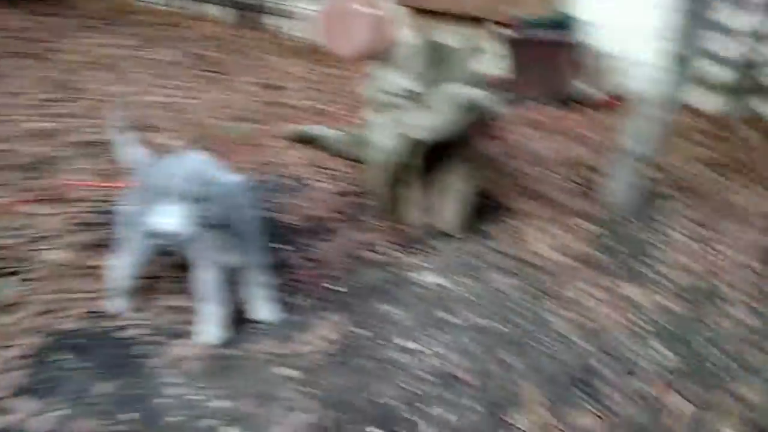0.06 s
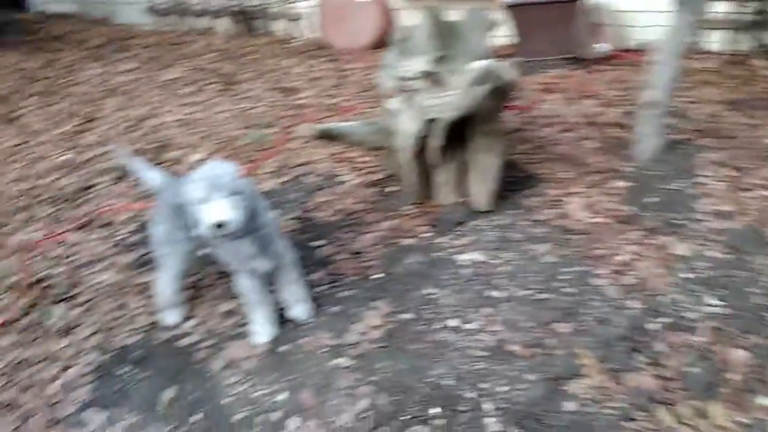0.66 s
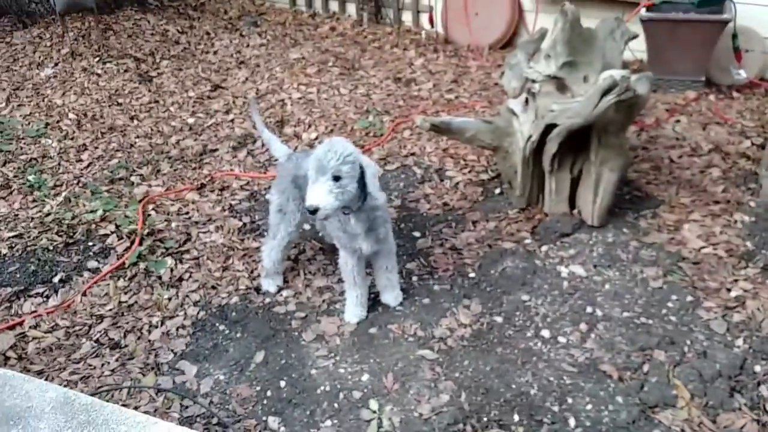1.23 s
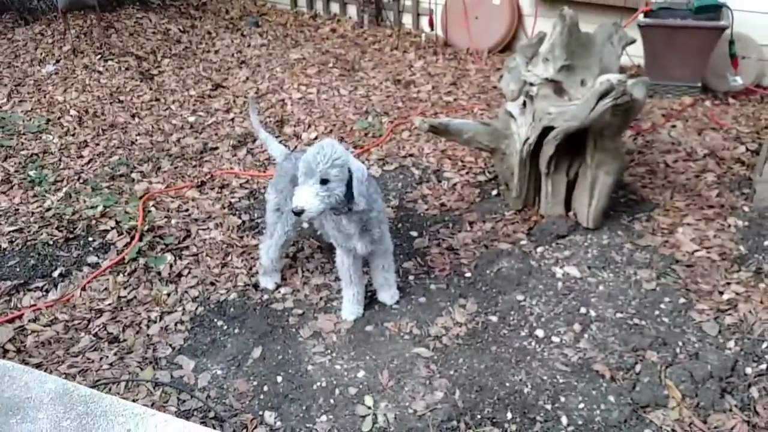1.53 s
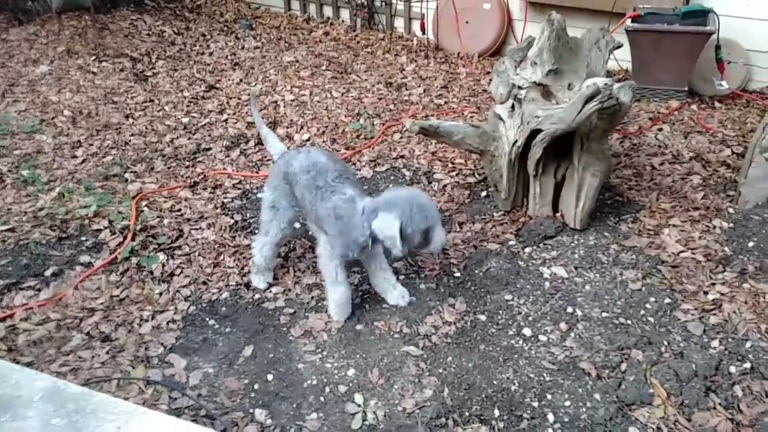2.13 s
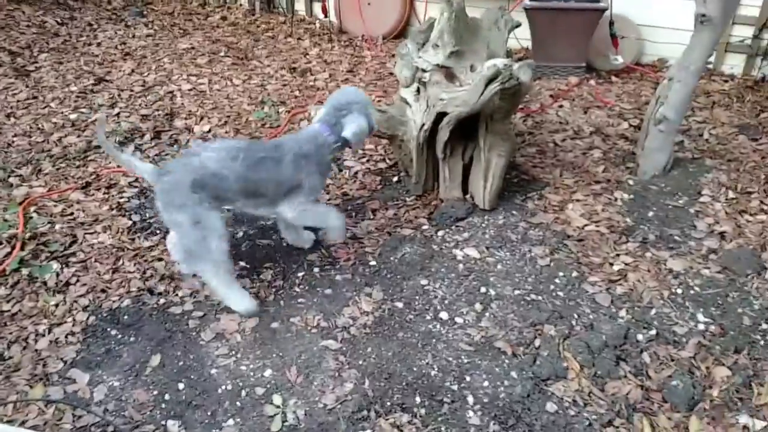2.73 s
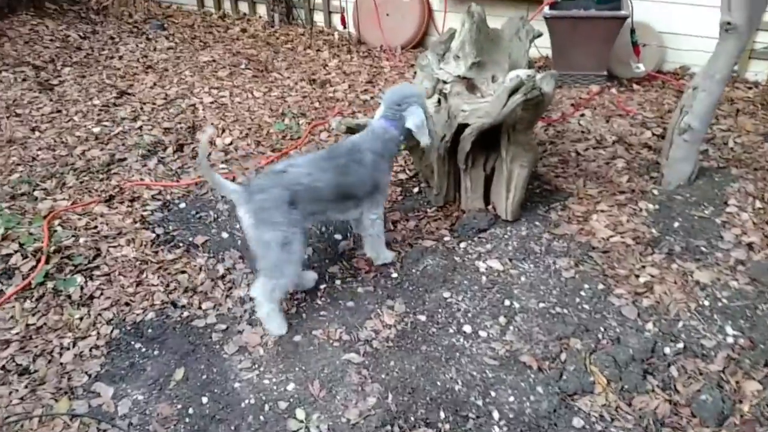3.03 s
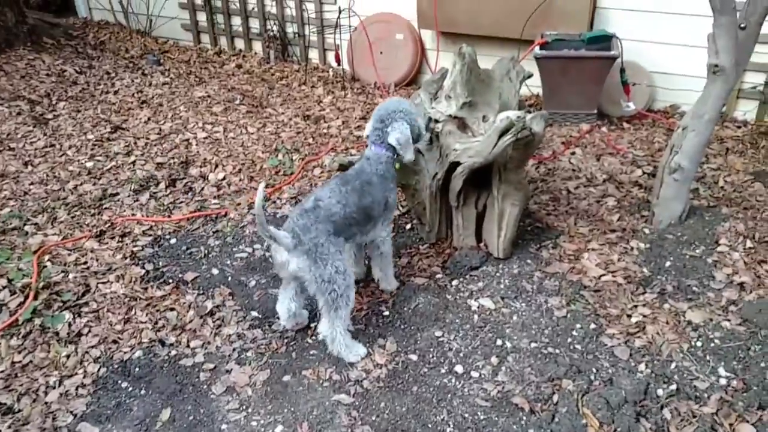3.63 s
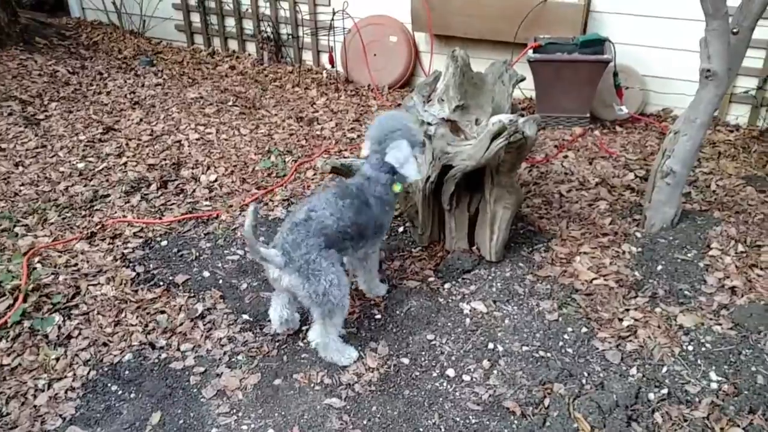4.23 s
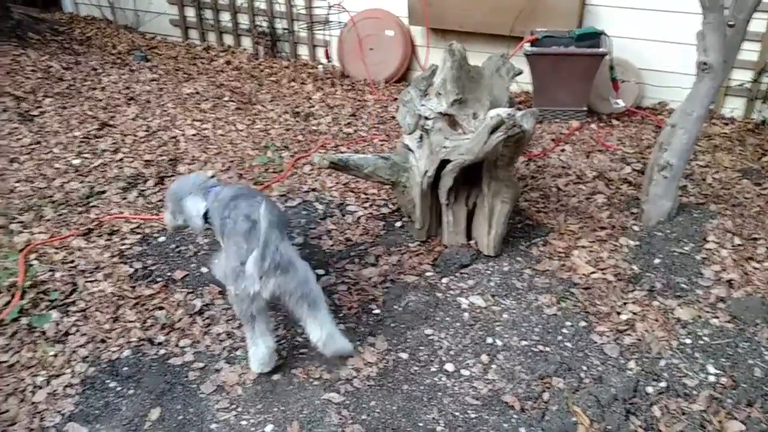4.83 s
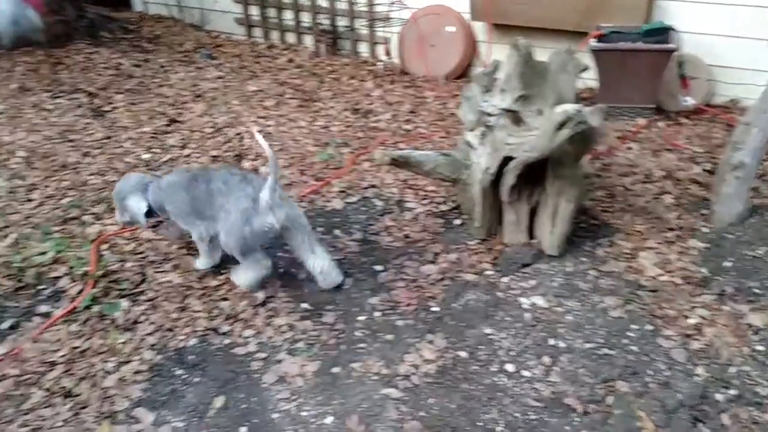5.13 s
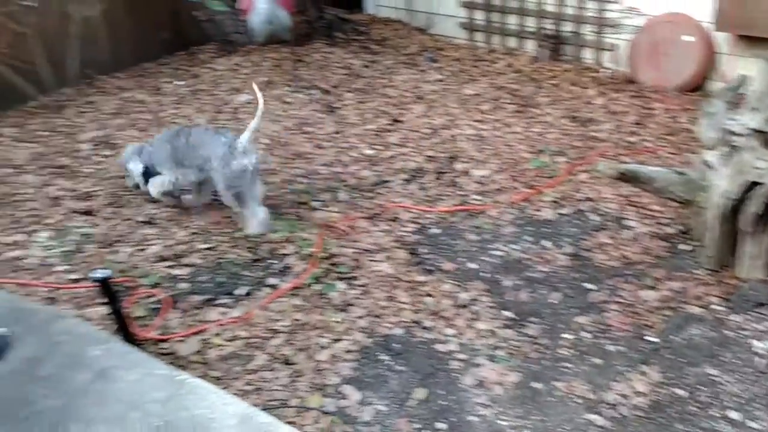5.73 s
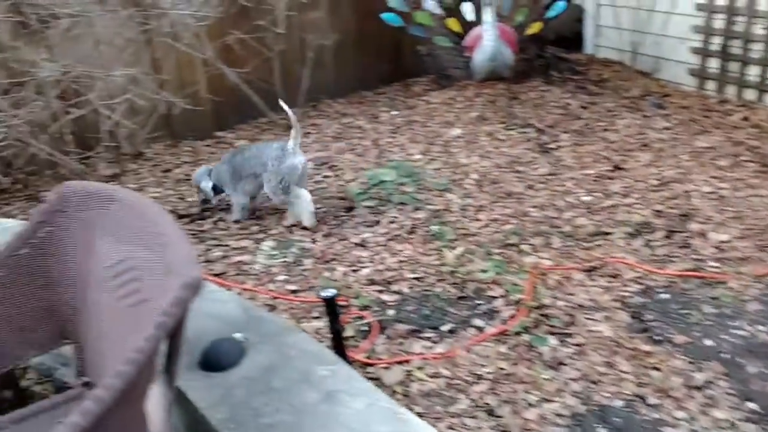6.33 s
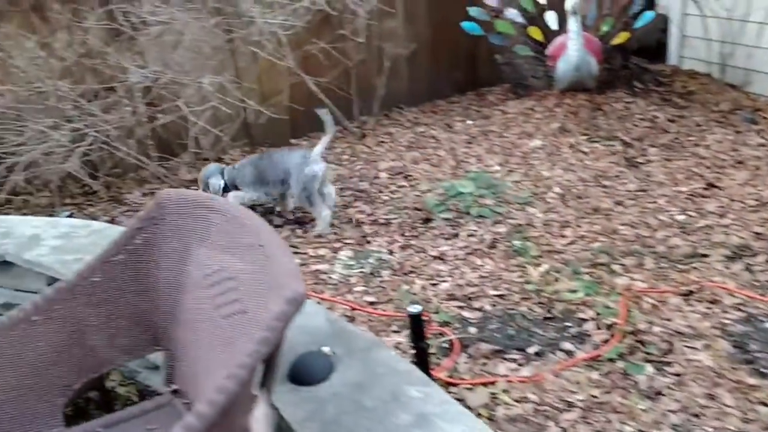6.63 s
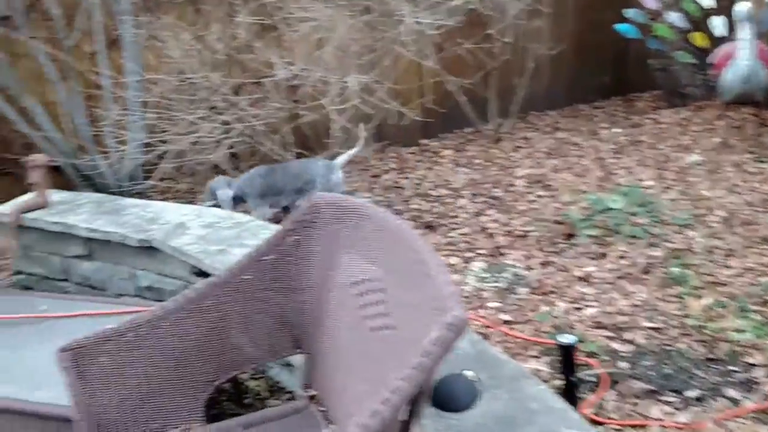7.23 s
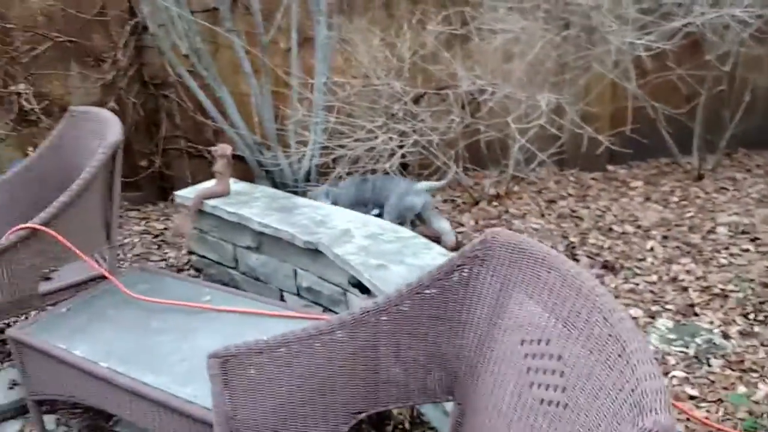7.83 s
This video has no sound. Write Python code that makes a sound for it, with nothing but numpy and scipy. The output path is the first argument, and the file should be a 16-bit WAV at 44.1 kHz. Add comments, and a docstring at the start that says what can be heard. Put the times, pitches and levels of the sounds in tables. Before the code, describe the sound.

Sparrows chirp in short, raspy, gliding notes from the start until about 7.2 seconds, slightly smeared by the yard's walls. A flock chatters behind them, busiest in the first second and a half, and a low town hum runs throughout. The hand-held microphone takes dull low thumps with some rumble, the loudest sounds here, at 0.1 to 0.4 seconds and around 2.2, with softer ones near 1.5, 2.9 and 4.3. A puppy gives one short, breathy huff just before 2 seconds. Its paws crackle faintly in dry leaves from 2.5 to 3.2 seconds and again from 5.3 to 7.6. A far bird calls softly and hoarsely between 5.6 and 7 seconds, while a distant vehicle's drone swells, peaking near 6.8. A light knock sounds close by at 7.3, then several more with a brief dull rub around 8 seconds.

```python
"""A fenced back yard, over the low hum of a town and a far vehicle. Sparrows chirp in gliding,
frequency-modulated whistles that house wall and fence smear by scattering; behind them the flock
chatters and a far bird calls hoarsely. A puppy crackles through dry leaves and gives one short huff,
air noise shaped by its throat. The hand-held phone takes dull bumps and a handling rumble;
light knocks and a rub sound close by."""
import sys
import numpy as np
from scipy import signal
from scipy.fft import rfft, irfft, next_fast_len
from scipy.io import wavfile
from scipy.ndimage import uniform_filter1d

SR = 44100
rng = np.random.default_rng(int(sys.argv[2]) if len(sys.argv) > 2 else 0)


def generate_wav(sig):
    """Save sig (samples, or channels by samples) to the path in sys.argv[1] as 16-bit PCM at SR."""
    pcm = np.round(np.clip(np.atleast_2d(sig).T, -1, 1) * 32767).astype(np.int16)
    wavfile.write(sys.argv[1], SR, pcm)


N = 355440
T = np.arange(N) / SR


def undb(db):
    """Amplitude ratio: a factor of ten per 20 dB."""
    return 10 ** (np.asarray(db) / 20)


def unit(x):
    """Normalisation to rms 1."""
    return x / np.sqrt(np.mean(x ** 2) + 1e-20)


def curves(table):
    """Linear interpolation of each column of a time table."""
    times, *columns = np.transpose(table)
    return [np.interp(T, times, column) for column in columns]


def add(out, start_s, x):
    """Superposition: x adds to out from start_s on."""
    i = max(int(start_s * SR), 0)
    out[i:i + len(x)] += x[:max(N - i, 0)]


def colour(x, spectrum):
    """Spectral shaping by (frequency_hz, gain_db) points, normalised to rms 1."""
    hz, db = np.transpose(spectrum)
    size = next_fast_len(len(x))
    bins_hz = np.maximum(np.fft.rfftfreq(size, 1 / SR), 1)
    gain = undb(np.interp(np.log(bins_hz), np.log(hz), db))
    return unit(irfft(rfft(x, size) * gain, size)[:len(x)])


def noise(spectrum):
    """Gaussian noise of the given spectral shape, rms 1."""
    return colour(rng.standard_normal(N), spectrum)


def resonate(x, hz, width_hz):
    """A second-order resonance, gain 1 at its centre."""
    return signal.lfilter(*signal.iirpeak(hz, hz / width_hz, fs=SR), x)


def wander(rate_hz):
    """Random modulation: rate_hz new values a second, spread near 1."""
    return np.interp(T * rate_hz, np.arange(2 ** 14), rng.standard_normal(2 ** 14))


def envelope(start_s, hold_s, attack_s, release_s):
    """Linear rise, hold and exponential decay."""
    rise = np.clip((T - start_s) / attack_s, 0, 1)
    return rise * np.exp(-np.maximum(T - start_s - attack_s - hold_s, 0) / release_s)


def yard(x, direct_db, t60_s=0.33):
    """Reverberation: wall, fence and houses scatter a decaying tail; direct_db is relative to it."""
    t = T[:SR // 2]
    decay = np.exp(-np.log(1000) * t / t60_s)
    response = unit(rng.standard_normal(len(t)) * decay) / np.sqrt(len(t))
    response[0] += undb(direct_db)
    return signal.fftconvolve(x, response / np.linalg.norm(response))


# distant traffic: time_s, hum_db, wash_db
TOWN_LEVELS = [(0, -42.5, -52), (1, -43, -54.5), (5.0, -42.5, -54), (5.8, -43.5, -54.5), (6.8, -43, -54),
               (8.06, -44.5, -55)]
# spectra of its low hum and broad wash: frequency_hz, gain_db
HUM_SPECTRUM = [(30, -21), (70, -10), (110, -5), (160, -1), (230, -4.5), (320, -10.5), (450, -16.5),
                (700, -41.5), (1500, -75)]
WASH_SPECTRUM = [(150, 7), (400, 2), (600, 1.5), (900, -1.5), (1400, -7), (2200, -12.5), (4000, -25),
                 (7000, -27.5), (11000, -30.5), (15500, -34)]

def town(whine_hz=614, whine_db=-70):
    """Incoherent summation: far traffic merges into noise, with a faint machine whine wavering in it."""
    hum_db, wash_db = curves(TOWN_LEVELS)
    hum = undb(hum_db + 1.07 * wander(13)) * noise(HUM_SPECTRUM)
    wash = undb(wash_db + 0.64 * wander(6)) * noise(WASH_SPECTRUM)
    phase = 2 * np.pi * np.cumsum(whine_hz + 3 * wander(8)) / SR
    whine = unit(np.sin(phase) + undb(-7) * np.sin(2 * phase))
    return hum + wash + undb(whine_db + 2.6 * wander(2.8)) * whine


# drone behind the houses: frequency_hz, gain_db
VEHICLE_SPECTRUM = [(100, -24), (190, 3), (280, 2.5), (420, -5), (650, -14), (1200, -46)]

def vehicle(nearest_s=6.81, nearest_db=-47, swell_s=0.99):
    """Attenuation with distance: a passing drone swells as it nears and fades as it recedes."""
    swell = undb(nearest_db) / (1 + ((T - nearest_s) / swell_s) ** 2)
    return swell * noise(VEHICLE_SPECTRUM)


# soft hoarse calls of a far bird: start_s, length_s, level_db
FAR_BIRD_CALLS = [(5.653, 0.15, -57), (5.86, 0.22, -59.5), (6.073, 0.066, -60), (6.677, 0.12, -59.5),
                  (6.793, 0.17, -58.5)]
# its throat resonance: frequency_hz, gain_db
FAR_BIRD_SPECTRUM = [(600, -19), (1100, -7), (1450, 1), (1750, -1), (2200, -27), (3500, -40)]

def far_bird():
    """Formant filtering: each call is noise that swells and fades in one narrow throat resonance."""
    swell = np.zeros(N)
    for start_s, length_s, level_db in FAR_BIRD_CALLS:
        add(swell, start_s, undb(level_db) * np.sqrt(np.hanning(int(length_s * SR))))
    return swell * noise(FAR_BIRD_SPECTRUM)


# base level of the further flock, busy at first: time_s, level_db
FLOCK_LEVELS = [(0, -59.5), (1.4, -68), (1.7, -73), (8.06, -77)]
# its chatter: frequency_hz, gain_db
CHATTER_SPECTRUM = [(1800, -20), (2600, 0.5), (3300, 9.5), (4200, 7.5), (5000, 1), (6000, -12), (7500, -38),
                    (10000, -28), (14000, -41)]

def flock(near_birds, blur_s=0.096, scatter_db=-5.5, fade_db_per_s=0.5, flicker_db=3):
    """Diffuse field: far chirps blur into chatter; a hiss of scattered chirps follows each near call."""
    near_rms = np.sqrt(np.abs(uniform_filter1d(near_birds ** 2, int(blur_s * SR))))
    scatter = near_rms * undb(scatter_db - fade_db_per_s * T)  # the hiss weakens over time
    swell = np.hypot(undb(curves(FLOCK_LEVELS)[0]), scatter)
    return swell * undb(flicker_db * wander(45)) * noise(CHATTER_SPECTRUM)


# something rubbing close by: time_s, level_db
RUB_LEVELS = [(7.6, -73), (7.8, -56.5), (7.95, -51), (8.06, -58)]
# its dull scrape: frequency_hz, gain_db
RUB_SPECTRUM = [(200, -14), (420, 9), (700, 1.5), (1100, -11), (1500, -6), (2200, -21), (4000, -42)]

def rub(catch_db=3):
    """Stick-slip friction: the noise flickers as the contact catches and slips."""
    return undb(curves(RUB_LEVELS)[0] + catch_db * wander(120)) * noise(RUB_SPECTRUM)


# light knocks close by: start_s, peak_db
KNOCK_HITS = [(.112, -40), (7.32, -43.5), (7.826, -47), (7.871, -46), (7.896, -45), (7.906, -49),
              (7.958, -35.5)]
# the modes they ring: frequency_hz, bandwidth_hz, gain_db
KNOCK_RESONANCES = [(624, 140, -19), (830, 610, 30), (1390, 180, 9)]

def knocks(contact_s=0.0027, scrape_db=-15, scrape_decay_s=0.032):
    """Impact excitation: brief rough contacts ring damped modes and scrape on a little."""
    out, t = np.zeros(N), T[:SR // 8]
    push = np.exp(-t / contact_s) + undb(scrape_db) * np.exp(-t / scrape_decay_s)
    for start_s, peak_db in KNOCK_HITS:
        force = rng.standard_normal(len(t)) * push
        ring = sum(undb(gain_db) * resonate(resonate(force, hz, width_hz), hz, hz)
                   for hz, width_hz, gain_db in KNOCK_RESONANCES)
        add(out, start_s, undb(peak_db) * ring / np.abs(ring).max())
    return out


# the hand shifts its grip: start_s, hold_s, level_db
GRIP_SHIFTS = [(0.29, 0.073, -32.5), (1.1, 0.078, -41), (1.44, 0.1, -38.5), (1.796, 1.2, -44.5),
               (2.22, 0.18, -39.5), (3.334, 0.43, -45.5), (4.206, 0.5, -46)]
# rumble of the grip: frequency_hz, gain_db
RUMBLE_SPECTRUM = [(8, -12), (25, 1.5), (50, 6), (80, 2), (130, -11.5), (300, -69)]
# fingers bump the phone: centre_s, peak_db, pitch_hz, half_length_s
FINGER_BUMPS = [ (.127, -19.5, 93, 0.0042), (0.295, -15.5, 134, 0.0036), (0.353, -21.5, 141, 0.0026),
                (0.398, -15.5, 119, 0.004), (1.545, -32.5, 147, 0.049), (2.166, -24, 119, 0.013),
                (2.177, -16.5, 150, 0.0035), (2.274, -13.5, 139, 0.0023), (2.289, -16, 114, 0.0056),
                (2.374, -25, 81, 0.0046), (2.916, -30, 48.3, 0.014), (4.235, -26, 103, 0.0048),
                (4.44, -26.5, 85, 0.0088)]

def handling(steady_hand_db=-52.5):
    """Structure-borne sound: the grip rumbles and soft fingers push the phone in short, low pulses."""
    shifts = sum(undb(level_db) * envelope(start_s, hold_s, attack_s=0.023, release_s=0.053)
                 for start_s, hold_s, level_db in GRIP_SHIFTS)
    out = np.hypot(shifts, undb(steady_hand_db)) * noise(RUMBLE_SPECTRUM)
    t = T[:SR // 5] - 0.1
    for centre_s, peak_db, pitch_hz, half_length_s in FINGER_BUMPS:
        pulse = np.exp(-(t / half_length_s) ** 2) * np.cos(2 * np.pi * pitch_hz * t)
        add(out, centre_s + t[0], undb(peak_db) * pulse)
    return out


# paws pressing dry leaves: start_s, length_s, level_db
PAW_STEPS = [ (2.562, 0.0069, -59), (2.901, 0.0098, -53.5), (2.925, 0.0063, -55), (2.987, 0.019, -65),
             (3.147, 0.02, -70), (5.259, 0.027, -54.5), (5.444, .035, -66.5), (5.497, .027, -65.5),
             (5.684, .029, -63), (5.727, 0.022, -62.5), (5.865, 0.05, -66), (6.106, 0.05, -69.5),
             (6.301, 0.069, -68.5), (6.422, .015, -66), (6.531, 0.053, -64.5), (6.784, 0.06, -67.5),
             (6.996, .026, -68), (7.362, .035, -67.5), (7.612, .012, -69)]
# spectra of cracking leaves and scuffed soil: frequency_hz, gain_db
LEAF_SPECTRUM = [(500, -26), (1500, 2.5), (2500, -0.5), (4500, 0.5), (7000, -1), (10000, -11), (15000, -16)]
SOIL_SPECTRUM = [(300, -26), (700, -4.5), (1100, 4.5), (1650, 2.5), (2300, -3.5), (4000, -22)]

def paws(release_s=0.0083, rustle_db=-76, snap_db=9, snap_decay_s=0.00034,
         scuff_db=8, scuff_build_s=0.0066, crackle_db=8, crackle_hz=1500):
    """Brittle fracture and friction: a paw cracks a leaf, crushes its tiny ribs and scuffs the soil."""
    leaves, soil, t = np.zeros(N), np.zeros(N), T[:SR // 4]
    for start_s, length_s, level_db in PAW_STEPS:
        press = np.minimum(t / 0.002, 1) * np.exp(-np.maximum(t - length_s * 1.04, 0) / release_s)
        snap = undb(snap_db) * np.exp(-t / snap_decay_s)
        add(leaves, start_s, undb(level_db) * (press + snap))
        add(soil, start_s, undb(level_db + scuff_db) * press * (1 - np.exp(-t / scuff_build_s)))
    crackle, grit = (rng.standard_normal(N) * undb(crackle_db * wander(crackle_hz)) for _ in range(2))
    return (leaves + undb(rustle_db)) * colour(crackle, LEAF_SPECTRUM) + soil * colour(grit, SOIL_SPECTRUM)


# the puppy's throat resonances, mouth open: frequency_hz, bandwidth_hz, gain_db
THROAT_FORMANTS = [(700, 230, 2.5), (1520, 150, 0.5)]

def huff(start_s=1.941, level_db=-42, pulse_hz=190, rasp=0.4, opening_s=0.0198):
    """Source and filter: unevenly chopped air rings two formants that rise as the mouth opens."""
    chop_hz = pulse_hz * np.exp(0.2 * wander(100))
    chop = 1 + rasp * np.sin(2 * np.pi * np.cumsum(chop_hz) / SR)
    air = rng.standard_normal(N) * chop
    voice = sum(undb(gain_db) * unit(resonate(resonate(air, hz, width_hz), hz, 2 * width_hz))
                for hz, width_hz, gain_db in THROAT_FORMANTS)
    frequency_ratio = 1 - 0.2 * np.exp(-np.maximum(T - start_s, 0) / opening_s)
    voice = unit(np.interp(np.cumsum(frequency_ratio) / SR, T, voice))
    return voice * undb(level_db) * envelope(start_s, hold_s=0.014, attack_s=0.012, release_s=0.034)


# near chirps: start_s, length_s, start_hz, end_hz, level_db, trill_depth_hz, direct_over_scatter_db
SPARROW_CHIRPS = [ (0.0, 0.086, 3640, 3466, -53, 430, -15), (0.039, .11, 4790, 4930, -53, 300, 4),
                  (0.139, 0.069, 3950, 3074, -51, 250, -3), (0.261, 0.1, 3970, 2516, -58.5, 280, -8),
                  (.424, 0.16, 4480, 4170, -64.5, 300, -2), (.591, 0.075, 4500, 3570, -54, 400, -6),
                  (.68, 0.15, 5000, 3570, -58, 550, 1), (0.738, .06, 3710, 3660, -53, 60, -4),
                  (0.836, 0.044, 4100, 3560, -55.5, 200, -1), (0.992, 0.13, 4960, 3390, -58.5, 330, -9),
                  (1.167, 0.051, 4450, 4260, -56, 150, -4), (1.203, 0.097, 3470, 3170, -59.5, 300, -6),
                  (1.296, 0.034, 4670, 4970, -51, 330, -3), (1.345, 0.057, 4670, 3470, -52, 450, -11),
                  (1.425, 0.058, 4300, 3200, -58.5, 400, -10), (1.5, 0.067, 4360, 4430, -57, 130, -3),
                  (1.529, 0.081, 3530, 3100, -61.5, 360, -10), (1.722, 0.17, 4900, 3710, -65, 300, -15),
                  (1.914, 0.13, 4480, 3080, -54, 251, -6), (2.132, 0.034, 5090, 5050, -52, 100, 3),
                  (2.172, 0.0495, 4000, 4210, -55.5, 250, -6), (2.402, 0.13, 4300, 3910, -58.5, 440, -8),
                  (2.503, 0.08, 4140, 3950, -53, 380, -6), (2.506, .03, 4970, 5080, -57, 100, -4),
                  (2.607, 0.11, 4140, 3520, -53.5, 320, -1), (2.872, 0.072, 5030, 4430, -56.5, 330, -8),
                  (2.961, 0.08, 3850, 3350, -53, 454, -4), (3.041, .092, 3700, 3150, -58, 560, -8),
                  (3.209, 0.067, 4340, 3310, -54.5, 130, -1), (3.472, 0.06, 3870, 4190, -52.5, 550, -10),
                  (3.486, 0.053, 5320, 5290, -54, 200, -6), (3.555, .072, 3150, 4370, -51, 480, 1.5),
                  (3.889, 0.085, 4290, 3460, -54, 302, -10), (4.047, 0.11, 4370, 4180, -53.5, 260, 0),
                  (4.087, 0.045, 5210, 4870, -58.5, 400, -8), (4.13, .1, 3130, 2710, -60, 280, -8),
                  (4.158, 0.047, 3630, 3620, -46, 190, -2), (4.638, 0.16, 3920, 3500, -64, 480, -10),
                  (4.962, 0.13, 5450, 3450, -61.5, 300, -4), (5.068, 0.073, 3350, 1940, -56.5, 220, -2),
                  (5.326, .09, 4540, 3235, -55.5, 420, -6), (5.519, 0.025, 4020, 5020, -52.5, 250, -4),
                  (5.545, 0.099, 4160, 4360, -52.5, 840, -3), (5.642, 0.05, 3880, 3100, -49, 330, -5),
                  (5.804, 0.15, 4280, 3600, -63.5, 450, 1), (6.133, .065, 4710, 4090, -58, 450, -3),
                  (6.177, .1, 3750, 1950, -56, 70, 0), (6.567, 0.14, 4750, 3590, -63, 520, -4),
                  (6.811, 0.1, 4190, 3510, -60, 480, -5), (7.131, 0.04, 4750, 3820, -52, 280, -13),
                  (7.176, 0.032, 3500, 3094, -51.5, 190, -5)]

def sparrows(trill_hz=170, trill_spread=0.247, trill_fade=0.29, glide_ease=0.61, waver_hz=35,
             flutter_db=4.5, overtone_db=-28, rasp=0.6, rasp_hz=700, beak_hz=3900, beak_db_per_octave=3):
    """Frequency modulation: a fast, uneven trill of the syrinx makes each gliding whistle raspy."""
    out, waver, flutter, uneven = np.zeros(N), wander(350), wander(220), wander(90)
    chaos = unit(signal.sosfilt(signal.butter(4, rasp_hz, fs=SR, output="sos"), rng.standard_normal(N)))
    deepest_hz = max(depth_hz for *_, depth_hz, _ in SPARROW_CHIRPS)
    for start_s, length_s, start_hz, end_hz, level_db, depth_hz, direct_db in SPARROW_CHIRPS:
        rate_offset, trill_phase = rng.standard_normal(2)
        progress = np.linspace(0, 1, int(length_s * SR))
        span = slice(int(start_s * SR), int(start_s * SR) + len(progress))
        rate_hz = trill_hz * np.exp(trill_spread * (rate_offset / 2 + uneven[span]))
        trill = np.sin(2 * np.pi * np.cumsum(rate_hz) / SR + trill_phase)
        trill *= depth_hz * (1 - trill_fade * progress)
        glide = progress + glide_ease * (np.sin(np.pi / 2 * progress) ** 2 - progress)
        pitch_hz = start_hz + (end_hz - start_hz) * glide + trill + waver_hz * waver[span]
        phase = 2 * np.pi * np.cumsum(pitch_hz) / SR
        whistle = np.sin(phase) + undb(overtone_db) * np.sin(2 * phase)
        attack, release = progress / 0.23, (1 - progress) / 0.04
        swell = np.sin(np.pi / 2 * np.minimum(np.minimum(attack, release), 1))
        # throat and beak favour the middle of the range, so a long fall dies away
        beak_loss_db = beak_db_per_octave * np.abs(np.log2(pitch_hz / beak_hz))
        swell *= undb(flutter_db * flutter[span] - beak_loss_db)
        # a deeper trill rattles the membranes more, spreading noise around the whistle
        rattle = 1 + rasp * depth_hz / deepest_hz * chaos[span]
        # the birds hop about, so each chirp takes its own paths through the yard
        add(out, start_s, undb(level_db) * yard(unit(swell * rattle * whistle), direct_db))
    return out


def scene():
    """Direct-to-reverberant ratio: the sparrows arrive mostly by reflection; the nearer puppy is drier."""
    puppy = yard(paws() + huff(), direct_db=6)[:N]
    near_birds = sparrows()
    birds = near_birds + flock(near_birds) + far_bird()
    return (birds + puppy + knocks() + rub() + handling() + town() + vehicle())[None]


def record(dry, cutoff_hz=15500):
    """Band limiting: the phone cuts the top of the treble steeply."""
    return signal.sosfilt(signal.ellip(10, 0.2, 70, cutoff_hz, fs=SR, output="sos"), dry)


dry = scene()
out = record(dry)
generate_wav(out)
```